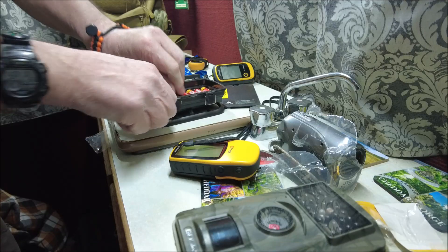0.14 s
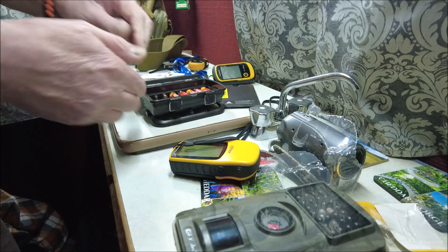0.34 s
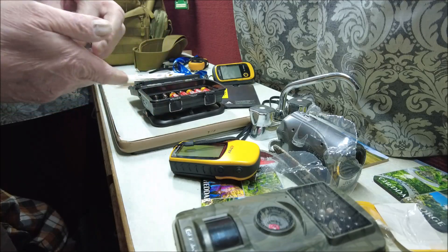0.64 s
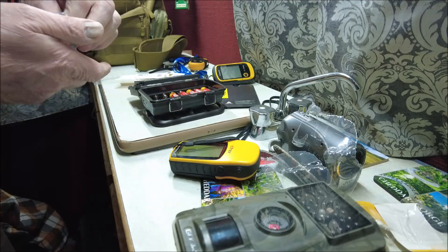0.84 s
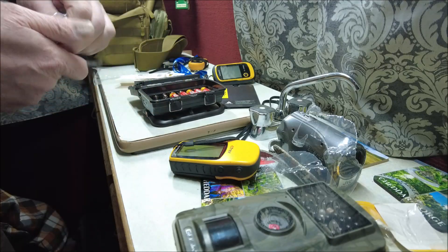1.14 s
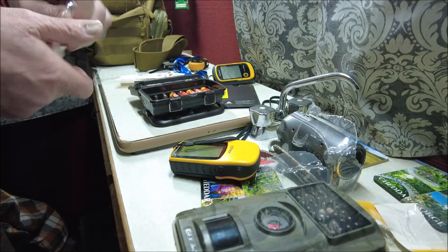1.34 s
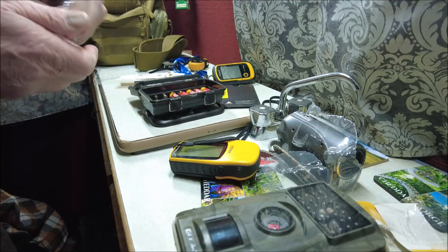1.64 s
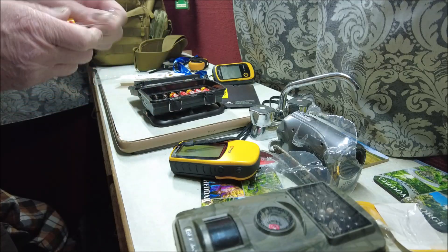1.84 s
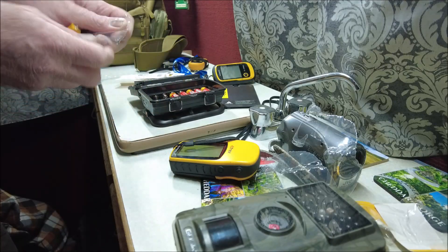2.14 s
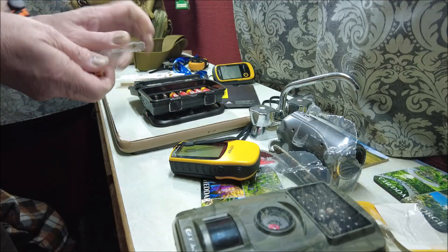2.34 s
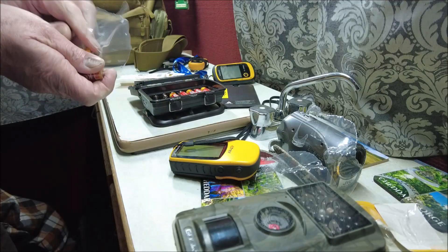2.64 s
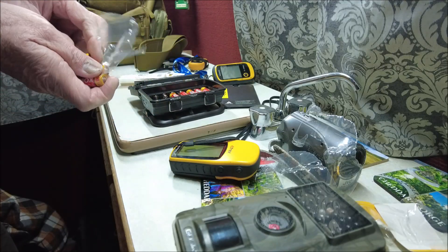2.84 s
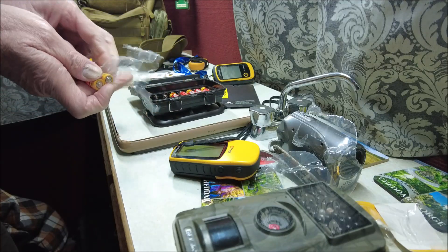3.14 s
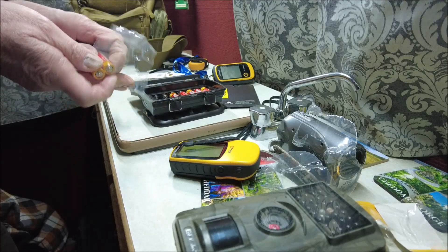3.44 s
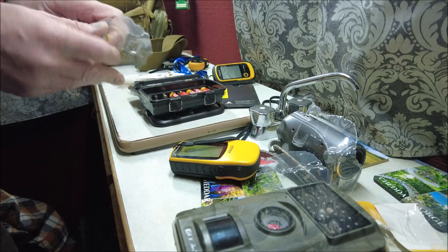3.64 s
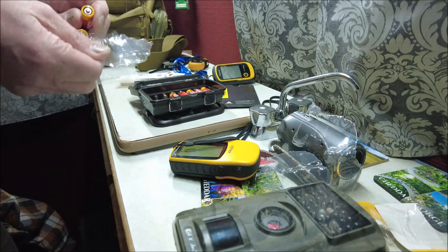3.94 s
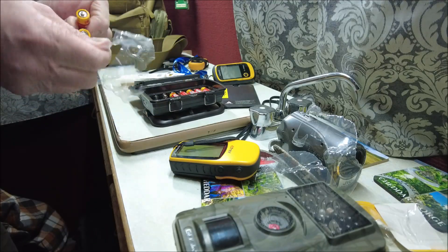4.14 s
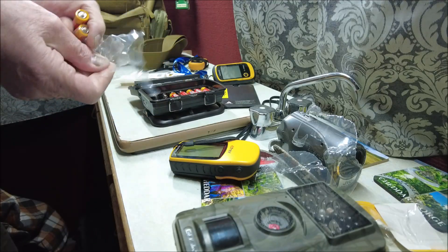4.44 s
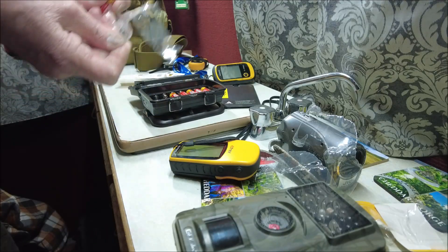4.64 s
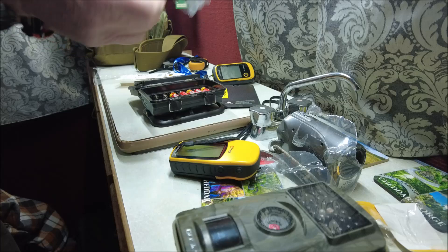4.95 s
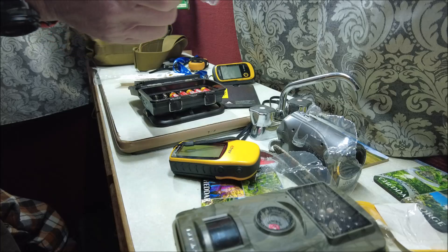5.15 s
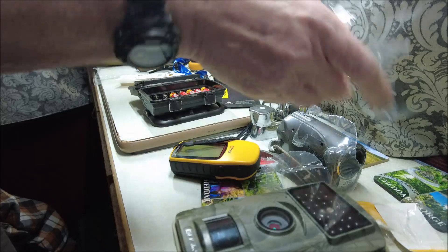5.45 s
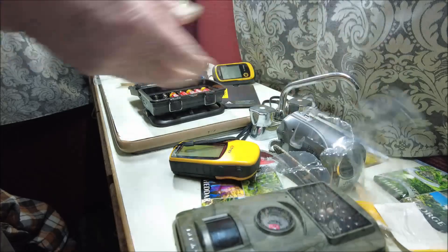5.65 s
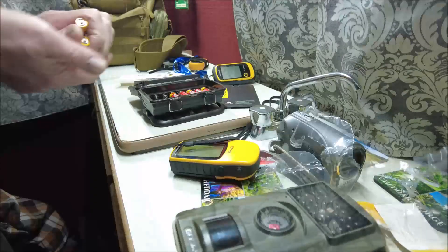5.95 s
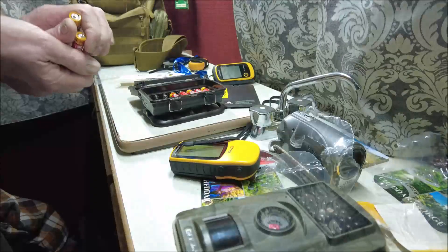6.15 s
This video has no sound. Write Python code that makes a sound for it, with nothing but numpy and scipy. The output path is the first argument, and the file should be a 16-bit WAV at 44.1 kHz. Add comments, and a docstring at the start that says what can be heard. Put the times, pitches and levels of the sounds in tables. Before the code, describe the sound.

Thin wrapper crumpling close by, sharp irregular creases and dry crackle, one faint metallic click, soft handling bumps, low air rumble.

```python
"""Plastic film crumples and tears off a pack of batteries, at arm's length in a small padded cabin. Each
buckling crease is a ragged jolt that rings a small and a large patch of film; finer creases crackle between.
Cells click as struck modes, contacts knock as damped resonances, and brushing skin and a gust of air sound as
filtered noise. The cabin answers with a short tail of decaying noise bands, over low air rumble and microphone
hiss."""
import sys
import numpy as np
from scipy import signal
from scipy.fft import rfft, irfft, next_fast_len
from scipy.io import wavfile
from scipy.ndimage import uniform_filter1d

SR = 44100
rng = np.random.default_rng(int(sys.argv[2]) if len(sys.argv) > 2 else 0)


def digitize_waveform(pressure):
    """Quantize a signal to 16-bit integers and store it at the path in sys.argv[1].

    Rows of a 2-D input are taken as channels; values are limited to [-1, 1].
    """
    field = np.atleast_2d(pressure).T
    bounded = np.clip(field, -1, 1)
    quanta = np.round(bounded * 32767).astype(np.int16)
    wavfile.write(sys.argv[1], SR, quanta)


N = 278271
TIME_S = np.arange(N) / SR
BIN_HZ = np.fft.rfftfreq(N, 1 / SR)


def undb(db):
    """Level to amplitude: 20 dB is a factor of ten."""
    return 10 ** (np.asarray(db) / 20)


def unit(x):
    """Normalisation to an rms of 1."""
    return x / np.sqrt(np.mean(x ** 2))


def resonance(hz, centre_hz, q):
    """Damped resonance: complex response with gain 1 at the centre."""
    ratio = np.maximum(hz, 1.) / centre_hz
    return 1 / (1 + 1j * q * (ratio - 1 / ratio))


def coloured(colour):
    """Spectral shaping: white noise takes the contour of a table and is set to rms 1."""
    size = next_fast_len(N)
    hz, db = np.transpose(colour)
    log_hz = np.log(np.fft.rfftfreq(size, 1 / SR) + 1)
    gain = undb(np.interp(log_hz, np.log(hz), db))
    return unit(irfft(rfft(rng.standard_normal(size)) * gain, size)[:N])


def held_noise(hold, average=1):
    """Slow random modulation: values held for some samples, then smoothed by a moving average."""
    steps = np.repeat(rng.standard_normal(N // hold + 1), hold)
    return uniform_filter1d(steps, average)[:N]


def jolts(rows, slip_s, size):
    """Stick-slip: spectra of ragged pushes that rise and die within a few slip times."""
    t = np.arange(size) / SR
    push = rng.standard_normal((rows, size)) * t * np.exp(-t / slip_s)
    return rfft(push), np.fft.rfftfreq(size, 1 / SR)


def ring(jolt, response):
    """Source and filter: each jolt excites a response, scaled to peak 1."""
    sound = irfft(jolt * response)
    return sound / np.abs(sound).max(axis=1, keepdims=True)


def place(start_s, sound):
    """Superposition: one row of sound is added at each start time."""
    out = np.zeros(N + sound.shape[1])
    start = np.minimum(start_s * SR, N - 1).astype(int)
    np.add.at(out, start[:, None] + np.arange(sound.shape[1]), sound)
    return out[:N]


# spectral contour of the microphone hiss: frequency_hz, relative density_db per Hz
HISS_COLOUR = [(300, -22), (1000, -35), (7000, -54), (16000, -103)]


def hiss(level_db=-74):
    """Stationary noise: the hiss of the microphone has a constant spectrum and level."""
    return undb(level_db) * coloured(HISS_COLOUR)


# air moving at the microphone, before the flutter: time_s, level_db
AIR_LEVEL = [(0, -55.5), (1.2, -48.5), (1.8, -53.5), (2.3, -45.5), (3.2, -54.5), (4.2, -54.5), (5, -60),
             (5.7, -54.5)]
# spectral contour of that air: frequency_hz, relative density_db per Hz
AIR_COLOUR = [(1.5, -33), (5, 23), (20, -1), (35, 0), (62, -9.5), (150, -26), (500, -51)]


def air():
    """Modulated low-frequency noise: the rumble of draughts comes in flutters."""
    time_s, level_db = np.transpose(AIR_LEVEL)
    flutter_db = 4.9 * held_noise(3000, 3000)
    return coloured(AIR_COLOUR) * undb(np.interp(TIME_S, time_s, level_db) + flutter_db)


# bands of the cabin's tail: centre_hz, q (no unit), t60_s, level_db
CABIN_TAIL = [(251, 1.12, 0.058, 1), (2330, 0.5, 0.027, -4), (8060, 1.1, 0.0061, -3.5)]


def cabin(dry):
    """Reverberation: a low mode and dense early reflections that die faster in the treble."""
    size = 8192
    t, hz = np.arange(size) / SR, np.fft.rfftfreq(size, 1 / SR)
    response = 0
    for centre_hz, q, t60_s, level_db in CABIN_TAIL:
        band = irfft(rfft(rng.standard_normal(size)) * resonance(hz, centre_hz, q) ** 2, size)
        decay = np.exp(-np.log(1000) * t / t60_s)
        band = band * decay * (t > .002)  # nothing returns in the first 2 ms
        bandwidth_gain = np.sqrt(centre_hz / q / SR)
        response = response + undb(level_db) * bandwidth_gain * band / np.sqrt(np.sum(band ** 2))
    return signal.fftconvolve(dry, response)[:N]


# skin and sleeve brushing past things, and a low gust of air near 4.1 s: peak_s, level_db, length_s, centre_hz
SWELLS = [(0.23, -69, 0.16, 201), (0.252, -68, 0.051, 640), (1.957, -57, 0.047, 490),
          (2.684, -66, 0.059, 645), (4.1, -62, 0.0067, 165), (4.127, -51, 0.019, 52.3),
          (5.245, -65.5, 0.035, 450), (5.644, -62.5, 0.041, 550), (5.847, -71, 0.043, 694)]


def swells():
    """Filtered noise: soft, dull, slightly grainy swells of brushing and of moving air."""
    grain_db = 3.3 * held_noise(256)
    rub = rfft(rng.standard_normal(N) * undb(grain_db))
    out = 0
    for peak_s, level_db, length_s, centre_hz in SWELLS:
        swell = undb(level_db) * np.exp(-((TIME_S - peak_s) / length_s) ** 2)
        out = out + swell * unit(irfft(rub * resonance(BIN_HZ, centre_hz, 0.76) ** 2, N))
    return out


# dull knocks and low bumps of handling: start_s, peak_db, centre_hz
KNOCKS = [(.945, -47.5, 516), (1.008, -46, 357), (1.932, -51, 296), (1.961, -47, 516), (5.198, -50, 200)]


def knocks():
    """Damped impact: soft skin gives a slow push, slower for lower knocks, and a short dull ring."""
    start_s, peak_db, centre_hz = np.transpose(KNOCKS)
    jolt, hz = jolts(len(start_s), 0.88 / centre_hz[:, None], size=8192)
    return place(start_s, undb(peak_db)[:, None] * ring(jolt, resonance(hz, centre_hz[:, None], 1.9) ** 2))


# two cells click together: start_s, peak_db
CLICKS = [(0.5174, -37.5)]
# what the cells ring with: centre_hz, q (no unit), level_db
CELL_MODES = [(2030, 17, 3), (2800, 27, -3), (4340, 43, -7), (6900, 41, -8)]


def clicks():
    """Modal excitation: metal cans touch in a short jolt that rings a few modes."""
    start_s, peak_db = np.transpose(CLICKS)
    jolt, hz = jolts(len(start_s), 0.00008, size=4096)
    modes = sum(undb(level_db) * resonance(hz, centre_hz, q) for centre_hz, q, level_db in CELL_MODES)
    return place(start_s, undb(peak_db)[:, None] * ring(jolt, modes))


# air trapped in the emptying wrapper: centre_hz, q (no unit), level_db
POCKETS = [(1747, 15, -7), (604, 8.8, 4.5)]


def pockets(film):
    """Cavity resonance: trapped air rings in response to the creases."""
    response = sum(undb(level_db) * resonance(BIN_HZ, centre_hz, q) for centre_hz, q, level_db in POCKETS)
    return irfft(rfft(film) * response, N)


def palms(film):
    """Cavity resonance: the hollow between the palms answers the film with one broad, low peak."""
    return undb(5) * irfft(rfft(film) * resonance(BIN_HZ, 544, 1.49) ** 2, N)


def buckle(start_s, level_db, small_hz, large_hz, large_db, slip_s, q, tick_db, size=512):
    """Snap-through buckling: a crease slips, rings a small and a large patch and radiates a broad tick."""
    jolt, hz = jolts(len(start_s), slip_s, size)
    tick = undb(tick_db) * resonance(hz, 7240, 1.92) ** 2
    small = ring(jolt, resonance(hz, small_hz[:, None], 2.86 * q) ** 2 + tick)
    large_hz = large_hz[:, None]
    patch = resonance(hz, large_hz, q) ** 2
    skirt = undb(-12) * resonance(hz, 0.56 * large_hz, 0.57) ** 2  # the sheet round it flexes broadly, lower
    taut = undb(-4) * resonance(hz, 0.927 * large_hz, 9 * q)  # a taut panel in it rings on
    treble_loss = 1 + 1j * hz / 4000
    large = ring(jolt, (patch + skirt + taut) / treble_loss)
    return place(start_s, undb(level_db)[:, None] * (small + undb(large_db)[:, None] * large))


# bursts of rustle: peak_s, level_db, length_s, large_db (large patches over the small ones)
SQUEEZES = [(0.222, -70, 0.21, 0.5), (0.447, -70.5, 0.55, -0.5), (0.557, -60, 0.048, 2.5),
            (0.69, -66, 0.42, 0), (0.941, -61, 0.65, 2), (1.07, -60.5, 0.11, 8.5), (1.548, -57.5, 0.62, 3),
            (1.603, -48, 0.092, 2.5), (1.649, -40.5, 0.062, -7.5), (1.942, -45.5, 0.16, 1.5),
            (2.195, -56.5, 0.15, 6.5), (2.337, -54.5, 0.32, 0), (2.725, -55.5, 0.05, -6),
            (2.905, -56.5, 0.11, -1), (3.58, -63, 1, -4), (4.045, -68, 0.52, 0), (4.348, -63, 0.44, 2.5),
            (4.634, -58, 0.23, 0), (4.996, -56.5, 0.077, 7), (5.227, -59.5, 0.068, 13),
            (5.461, -64, 0.089, 2), (5.645, -62, 0.11, 1.5), (5.812, -59.5, 0.058, 1.5),
            (6.126, -68.5, 0.2, -2)]
RISE_DB, FALL_DB = 34, 25  # climb in one length before the peak, drop in one length after it
HELD_FROM_S, HELD_UNTIL_S, HELD_DB, HELD_LARGE_DB = 0.9, 6.0, -73, 1.5  # faint ticking of the held film


def squeezes():
    """Dominant source: the strongest squeeze sets the level and large-patch share, else the held film."""
    outside_s = np.maximum(0, np.maximum(HELD_FROM_S - TIME_S, TIME_S - HELD_UNTIL_S))
    level_db = HELD_DB - 150 * outside_s
    large_db = np.full(N, HELD_LARGE_DB)
    for peak_s, peak_db, length_s, own_large_db in SQUEEZES:
        slope_db = np.where(TIME_S < peak_s, RISE_DB, FALL_DB)
        burst_db = peak_db - slope_db * np.abs(TIME_S - peak_s) / length_s
        large_db = np.where(burst_db > level_db, own_large_db, large_db)
        level_db = np.maximum(burst_db, level_db)
    return level_db, large_db


def crackle(count=5000, scatter_db=4.0):
    """Crackling noise: fine creases at random moments and pitches, few strong and many weak."""
    when, strength, small, large, share = rng.random((count, 5)).T
    level_db, large_db = squeezes()
    start_s = when * N / SR
    start = (start_s * SR).astype(int)
    large_db = large_db[start] + 8 * (share - .5)
    crease_db = np.minimum(-scatter_db * np.log(1 - strength), 17)
    # creases within the same 2000 samples belong to one fold and share a size
    fold = np.repeat(rng.random((N // 2000 + 1, 2)), 2000, axis=0)[start].T
    small_hz = 4400 * 2 ** (0.67 * small + 0.42 * fold[0])
    large_hz = 1100 * 2 ** (1.15 * large + 0.94 * fold[1])
    grains = buckle(start_s, crease_db, small_hz, large_hz, large_db, slip_s=0.00068, q=0.85, tick_db=-29)
    grip_db = 4.14 * held_noise(700, 350)  # fingers press in short uneven bursts
    return unit(grains) * undb(level_db + grip_db)


# loud creases that buckle: start_s, peak_db (small patch), large_hz, large_db (large patch over the small)
SNAPS = [(0.8135, -37.5, 3760, 5), (0.8608, -44, 2160, 8), (0.8755, -35, 2900, -2), (0.9456, -27, 2560, -5),
         (1.0134, -29, 2620, -7), (1.0226, -41.5, 2950, 8), (1.0461, -48.5, 2900, 16.5),
         (1.057, -25.5, 2830, -4), (1.069, -43, 2700, -6), (1.081, -41.5, 1990, -1),
         (1.09, -38.5, 1890, -4), (1.1249, -32.5, 2480, -3.5), (1.1259, -26.5, 2950, -4.5),
         (1.1752, -45, 1500, -13), (1.1833, -31.5, 2970, -4.5), (1.206, -43.5, 1160, 4.5),
         (1.216, -52, 2080, 6), (1.2282, -43, 2500, 9), (1.2532, -33, 2780, -1.5), (1.376, -22, 2480, -1.5),
         (1.4051, -34, 3150, -0.5), (1.4494, -35.5, 1210, -4.5), (1.462, -34, 1410, -2.5),
         (1.4693, -32, 1690, 1), (1.5056, -43, 1460, 7.5), (1.518, -31.5, 1580, -4),
         (1.5236, -29, 1130, -7), (1.619, -41, 2140, -1), (1.6319, -28.5, 3040, -5),
         (1.6786, -46, 3620, -2), (1.7154, -22, 1570, -14.5), (1.7687, -31, 1670, -11),
         (1.7772, -21.5, 3100, -10), (1.818, -22.5, 3100, -11), (1.8385, -42, 3100, 3),
         (1.851, -34, 2400, -9.5), (1.9094, -13, 2060, -15), (1.931, -19, 1240, -6.5),
         (1.945, -32, 1590, -11), (1.968, -29.5, 2600, 2.5), (1.9875, -34, 2430, -4),
         (2.0095, -29, 2480, -7), (2.022, -28.5, 2150, 0), (2.056, -53, 2740, 12), (2.0865, -44, 1055, 9),
         (2.1273, -33.5, 2410, -8), (2.1861, -28.5, 1840, -17), (2.3003, -49.5, 2160, 12.5),
         (2.312, -40, 1850, 9.5), (2.459, -40.5, 2550, 3), (2.486, -27.5, 1830, -5.5),
         (2.5349, -23, 2520, -4), (2.624, -42, 1500, -10), (2.6411, -44, 2930, 5), (2.662, -48, 1810, 4),
         (2.687, -36, 3100, -1.5), (2.9741, -32, 1540, -5), (3.036, -23.5, 2900, -4.5),
         (3.0477, -32.5, 4000, -2.5), (3.1609, -43.5, 1830, 5.5), (3.302, -39.5, 2100, -12),
         (3.364, -39.5, 3380, -3), (3.384, -48, 3470, -2), (3.403, -39, 2510, 4), (3.4329, -63.5, 1640, 24),
         (3.4559, -30.5, 1600, -2), (3.5249, -23.5, 1620, -1), (3.538, -24.5, 2150, -20),
         (3.596, -58, 1610, -2), (3.637, -29, 1860, -9), (3.6518, -33.5, 3040, -17), (3.668, -35, 1880, -7),
         (3.6996, -56, 1730, 6), (3.7283, -32, 1620, -10), (3.778, -28, 1880, -9),
         (3.7903, -38.5, 1750, 11.5), (3.805, -37, 1800, 6.5), (3.83, -31.5, 2620, -4.5),
         (3.852, -23.5, 3270, -7), (3.8757, -36.5, 1900, -2), (3.924, -31, 1670, -16),
         (3.9524, -24, 2170, 0), (4.0109, -37, 3360, 1.5), (4.0254, -37, 1560, -5.5),
         (4.159, -33, 2700, -3), (4.1926, -35.5, 2780, -10.5), (4.2565, -38, 3350, 10.5),
         (4.293, -23.5, 2950, -9), (4.2978, -22, 3400, 6), (4.312, -37.5, 3600, 2.5),
         (4.3553, -27.5, 1760, -16), (4.365, -40.5, 1700, 4.5), (4.403, -36, 2000, -13),
         (4.4123, -41, 1760, -2), (4.4218, -29.5, 2030, -16), (4.4263, -24.5, 2270, -25),
         (4.464, -31, 1960, -6.5), (4.593, -38.5, 1420, -1.5), (4.65, -25, 2960, -13),
         (4.671, -42, 1910, -6), (4.6893, -34.5, 2880, 0.5), (4.7144, -29.5, 2800, -7.5),
         (4.779, -23, 1780, -13), (4.871, -27, 1940, -13.5), (4.8821, -34.5, 1540, 2.5),
         (4.8943, -40, 2480, 7.5), (4.9226, -35.5, 2100, 1), (4.9706, -16.5, 2040, -7),
         (4.9861, -27, 2120, -6.5), (5.0096, -27.5, 2580, 0.5), (5.03, -34, 2030, -15),
         (5.089, -47.5, 1700, -1), (5.12, -44.5, 2300, -4), (5.142, -30.5, 2980, 0),
         (5.173, -53.5, 1200, 6), (5.2032, -37, 2840, 12), (5.2073, -17, 1960, -9),
         (5.356, -28.5, 3340, -7.5), (5.425, -37.5, 2200, -8), (5.848, -58.5, 1810, 21.5)]


def snaps(count=8):
    """Avalanche: each loud crease sets off a dying swarm of neighbours with pitches near its own."""
    start_s, peak_db, large_hz, large_db = np.transpose(SNAPS)
    chance = rng.random((len(start_s), count + 1, 4))
    small_hz = 5200 * 2 ** (0.65 * chance[:, 0, 0])
    first = buckle(start_s, peak_db, small_hz, large_hz, large_db, slip_s=0.00018, q=1.55, tick_db=-9)
    lag, strength, small, large = (chance[:, 1:, k] for k in range(4))
    lag_s = 0.002 + .025 * lag ** 1.5
    swarm_s = start_s[:, None] + lag_s
    swarm_db = peak_db[:, None] - 13.5 - 550 * lag_s + 8 * (strength - .5)  # later neighbours are weaker
    swarm_small_hz = small_hz[:, None] * 2 ** (0.99 * (small - .5))
    swarm_large_hz = large_hz[:, None] * 2 ** (1.17 * (large - .5))
    swarm = buckle(swarm_s.ravel(), swarm_db.ravel(), swarm_small_hz.ravel(), swarm_large_hz.ravel(),
                   np.repeat(large_db, count), slip_s=0.00035, q=1.1, tick_db=-9)
    return first + swarm


def scene():
    """Superposition: the handled film and cells, the cabin's answer, the air and the hiss."""
    rustle = crackle()
    film = snaps() + rustle
    # the palms close round the pack, open within 0.1 s by 3.12 s, then the film hangs free
    cupped = np.clip((3.12 - TIME_S) * 10, 0, 1)
    enclosed = cupped * palms(film)
    free = (1 - cupped) * pockets(film + undb(4.5) * rustle)
    hands = film + enclosed + free + knocks() + clicks() + swells()
    return (hands + cabin(hands) + air() + hiss())[None]


def record(dry):
    """Band limiting: the camera cuts the top with a steep elliptic low-pass."""
    top_hz = 16100
    return signal.sosfilt(signal.ellip(8, .2, 70, top_hz, fs=SR, output="sos"), dry)


dry = scene()
out = record(dry)
digitize_waveform(out)
```